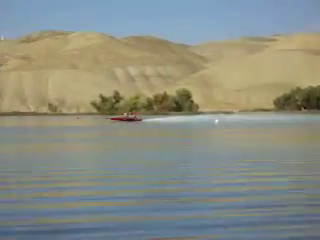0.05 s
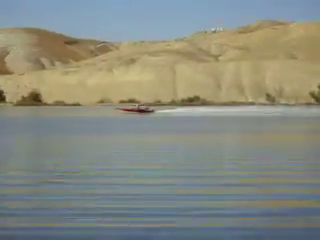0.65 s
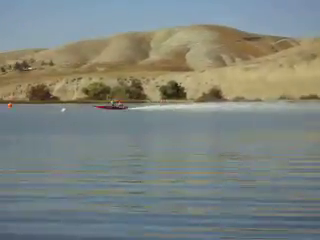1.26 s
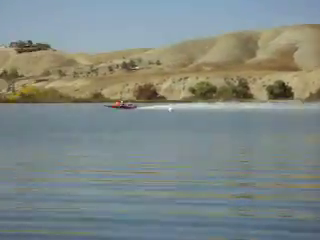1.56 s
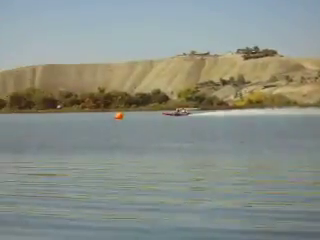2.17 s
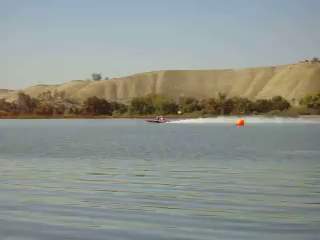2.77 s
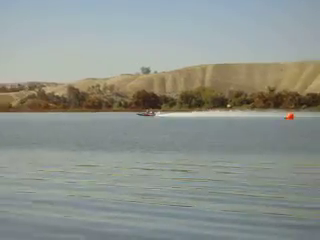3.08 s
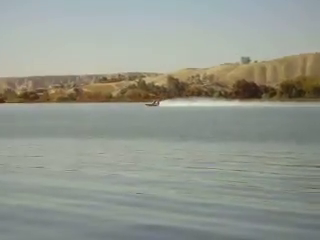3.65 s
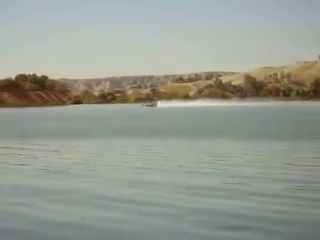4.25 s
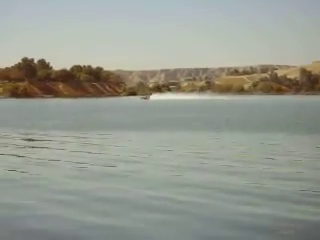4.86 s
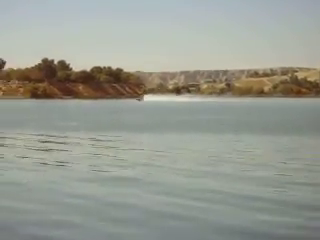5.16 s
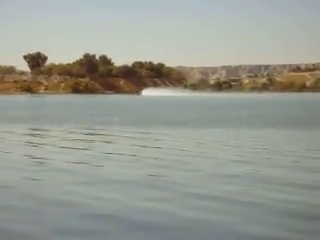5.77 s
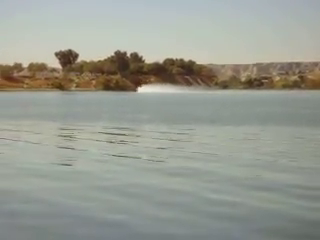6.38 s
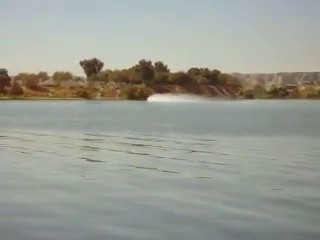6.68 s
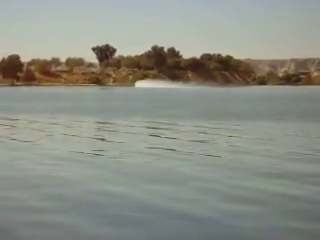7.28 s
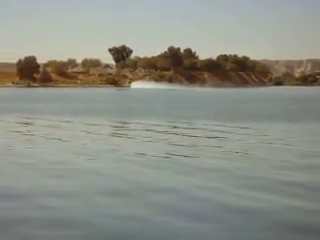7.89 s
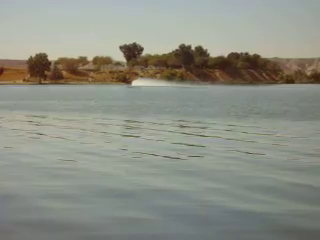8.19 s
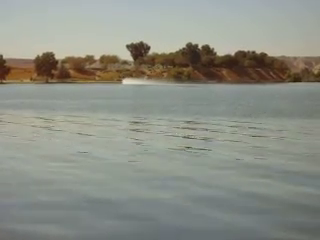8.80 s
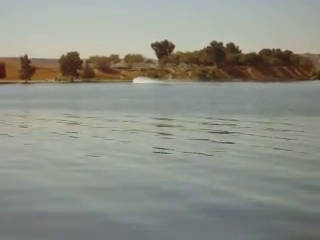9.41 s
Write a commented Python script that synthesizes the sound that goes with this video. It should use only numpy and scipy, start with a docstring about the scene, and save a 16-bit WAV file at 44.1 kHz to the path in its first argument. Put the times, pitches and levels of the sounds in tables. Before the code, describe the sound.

Heard from the shore through a small, slightly overloaded microphone, a speedboat tears by on a lake with a loud, rough engine drone and a faint high hiss. Its exhaust crackles at the nearest point, where there is a single click and a light swell of wind. The engine throbs, keeps dropping in pitch and ends in a lower, still strong burble, with a dull echo from the hills.

```python
"""A racing boat with an open-piped V8 comes by far out on a lake, its pitch sinking as it goes.
At first it is side-on: uneven firings make a stack of tones and a ragged roar, with a thin gear whine.
Near 2 s it is closest, each firing cracks, and the sound skips once with a click. A breeze swells.
The boat turns its stern to us and runs away; from about 6 s the throttle eases and the pipes burble.
All along, the hills echo it and a small microphone overloads on the peaks."""
import sys
import numpy as np
from scipy import signal
from scipy.fft import rfft, irfft
from scipy.io import wavfile
from scipy.ndimage import uniform_filter1d

SR = 44100
rng = np.random.default_rng(int(sys.argv[2]) if len(sys.argv) > 2 else 0)


def to_wav(sig):
    """Store sig (one row per channel, or 1-D mono) as 16-bit WAV at the path in sys.argv[1].

    Samples outside -1..1 are clipped; the rate is SR.
    """
    pcm = np.clip(np.atleast_2d(sig), -1, 1) * 32767
    pcm = np.round(pcm).astype(np.int16)
    wavfile.write(sys.argv[1], SR, pcm.T)  # frames by channels


N = 420713
TIME = np.arange(N) / SR

# breeze on the microphone: time_s, level_db
BREEZE_LEVEL = [(0, -55.5), (1.5, -42.5), (3, -38), (3.7, -62.5), (6, -60.5), (9.54, -59)]
# engine speed as heard (all eight cylinders fire once a cycle): time_s, cycle_hz
ENGINE_SPEED = [(0.0, 57.1), (0.29, 56.77), (1.03, 54.4), (1.51, 53.39), (1.75, 52.2), (1.91, 52.32),
                (2.15, 51.36), (2.55, 50.94), (2.82, 50), (2.97, 50.1), (3.67, 49.1), (4.04, 47.43),
                (4.7, 47.1), (5.0, 45.72), (5.63, 44.17), (5.95, 41.77), (6.3, 41.25), (6.8, 37.97),
                (7.15, 37.8), (7.41, 35.3), (8.07, 33.28), (8.34, 31.96), (8.53, 31.7), (8.82, 31.8),
                (8.98, 31.59), (9.54, 29.29)]
# the boat turns away (astern is 0 side-on, 1 from behind): time_s, astern, gain_db
BOAT_VIEW = [(0, 0.11, 0.53), (2, 0, 2.13), (3.5, 0.51, 0.5), (5, 0.77, 0.28), (6.5, 1, 1),
             (9.54, 0.94, 0.5)]
# strongest tones, at multiples of the cycle rate: harmonic, side_db, half_turned_db, behind_db
STRONG_TONES = [(8, -8, -19, -24), (11, -19.5, -19, -16), (16, -13.5, -16, -19.5), (19, -12.5, -24, -28),
                (21, -8.5, -21, -25.8)]
# how the pipes send out the other tones: harmonic, side_db, behind_db
OTHER_TONES = [(1.0, 1.7, -17), (2.0, -20, -12.5), (3.0, 14.5, -4.5), (4.0, -8, -6.5), (5.0, 19, 8),
               (6.0, -36, 3.5), (7.0, -1, 8), (9.0, 2, 10), (10.0, 5.5, 4), (12.0, 5, -6.5), (13.0, 2.7, 4),
               (14.0, 5, 1.5), (15.0, 0, 0.5), (17.0, 9, 1.9), (18.0, 3.2, -0.5), (20.0, 2.5, 1.3),
               (22.0, 4, 2), (23.0, -3.5, -2.5), (24.0, -3.5, 4.5), (25.0, -6, -8), (26.0, 10, -1),
               (27.0, -13.5, -12), (28.0, -8, 1), (29.0, -18.7, -5.6), (30.0, -4.5, -6.5)]
# where the pipes ring: pitch_hz, width_hz, level_db
PIPE_RESONANCES = [(245, 94, 3.5), (347.8, 8.3, -7), (397.4, 43.5, 1.75), (445.3, 58, -4.5), (581, 46, 3),
                   (631.3, 89, 3.5), (723.6, 94, 3), (954, 163, -3.5), (1070.6, 29, -9)]
# tone colour of the pipes and of each noise: pitch_hz, level_db
PIPE_COLOUR = [(50.0, -15), (100.0, 6), (160.0, -6), (300.0, -15.5), (420.0, -6.5), (520.0, -1),
               (620.0, -4.5), (740.0, 1), (880.0, -9), (1020.0, -4.5), (1200.0, -1.5), (1400.0, -24.5),
               (1800.0, -21)]
BREEZE_COLOUR = [(25, -13), (38, -4.5), (52, 7), (70, -9), (120, -23.5)]
SPRAY_COLOUR = [(3900, -20), (4400, 6), (5100, 4), (5500, -16)]
HISS_COLOUR = [(2000, -12), (2600, -4), (3100, 13), (3600, 4), (3950, -1), (4300, -19)]
RASP_COLOUR = [(1200, -27), (1450, 9), (1750, 7), (2050, -6), (2350, -9), (2900, -10)]
CRACK_COLOUR = [(1300, -23), (1700, -6), (1900, 7), (2200, -3), (2550, -9), (2900, -20)]
BARK_COLOUR = [(850, -22), (970, -5.5), (1080, 3), (1200, -1), (1320, -12), (1500, -17)]
BURBLE_COLOUR = [(30, -31.5), (50, -12.5), (80, -4), (130, 2), (220, 2.5), (300, 4), (420, -27)]
ROAR_COLOUR = [(280, -28.5), (350, -4.5), (420, -5.5), (520, -5), (650, 0), (780, -0.5), (900, -2.5),
               (1000, -10.5), (1100, -24.5)]
# loudness of the exhaust: time_s, tones_db, roar_db
EXHAUST_LEVEL = [(0, -28, -26), (1.4, -28, -23.5), (2.6, -26.5, -27), (3.4, -22.5, -26), (4.3, -24, -23),
                 (5.4, -27.5, -28), (6.5, -25.5, -25.5), (8.05, -28, -25.5), (8.3, -24.8, -22),
                 (9.0, -24.8, -21), (9.54, -28, -21.8)]
# what changes with the way the pipes face the shore: time_s, crack_db, throb (0 to 1), bark_db
PIPE_FACING = [(0, -19, 0, -28.5), (1.3, -12, 0.25, -25), (1.9, -10, .3, -26), (2.8, -5, 0.2, -23),
               (3.3, -18, 0.98, -21.5), (3.8, -26, 0.62, -24), (4.4, -30, 0.26, -24.5),
               (7.7, -31, 0.1, -29), (9.54, -31, 0.1, -29)]
# loudness shared by the rasp and the cracks: time_s, level_db
RASP_LEVEL = [(0.05, -26.5), (0.76, -33.5), (1.04, -29), (2.88, -29), (3.66, -32), (6.67, -40), (6.72, -36),
              (8.24, -33), (8.35, -27.5), (8.74, -34.5), (9.06, -33), (9.45, -44)]
# spells of gear whine: start_s, length_s, level_db
WHINES = [(0.0, 0.6, -30), (0.916, 0.52, -29)]
# sizzles of exhaust gas: start_s, length_s, pitch_hz, width_hz, level_db
SIZZLES = [(0.113, 0.27, 4500, 1400, -41.5), (0.848, 0.94, 3700, 1500, -40), (1.7, 1.55, 3800, 1300, -42),
           (3.22, 0.44, 3170, 450, -37), (4.05, 0.88, 3700, 600, -42.5), (5.497, 0.7, 3350, 1300, -41.5),
           (6.2, 0.6, 3300, 1350, -39.5), (8.25, 0.27, 2969, 700, -44.5)]

NEAR_BANK = (0, 1, 3, 6)  # of eight slots a cycle, those in which the near row of cylinders fires
NEAREST_S, NEAREST_M, BOAT_M_PER_S = 1.7, 110, 49  # the pass; distance dulls the hiss and spray


def undb(db):
    """Turn decibels into a gain."""
    return 10 ** (np.asarray(db) / 20)


def unit(x):
    """Scale a sound to an average (rms) level of 1."""
    return x / np.sqrt(np.mean(x ** 2))


def curves(table):
    """Turn each column after time_s into one value a sample."""
    time_s, *columns = np.transpose(table)
    return [np.interp(TIME, time_s, column) for column in columns]


def db_at(spectrum, hz):
    """Look up a tone colour's level at a pitch."""
    pitch_hz, db = np.transpose(spectrum)
    return np.interp(np.log(hz), np.log(pitch_hz), db)


def colour(x, spectrum, size=8192):
    """Filter a sound to a tone colour, cutting steeply outside it; the result has level 1."""
    hz = np.arange(size // 2 + 1) * SR / size + 1
    octaves_outside = np.abs(np.log2(hz / np.clip(hz, spectrum[0][0], spectrum[-1][0])))
    gain = undb(db_at(spectrum, hz) - np.minimum(24 * octaves_outside, 60))
    cepstrum = irfft(np.log(gain), size)
    cepstrum[size // 2:] = 0  # so the filter rings only after a sound, never before
    response = irfft(np.exp(2 * rfft(cepstrum)), size)
    return unit(signal.oaconvolve(x, response)[:N])


def wander(rate_hz, time=TIME):
    """A smooth random wobble, about 1 in size, with about rate_hz turns a second."""
    knots = rng.standard_normal(2048)
    smooth = signal.resample(knots, 8 * len(knots))
    return np.interp(time * rate_hz * 8, np.arange(len(smooth)), smooth)


def spell(start_s, length_s, fade_s=0.12):
    """Rise from 0 to 1, hold, and fall back."""
    return np.clip(np.minimum(TIME - start_s, start_s + length_s - TIME) / fade_s, 0, 1)


def firings(cycle, far_bank_db, scatter_db):
    """One pulse of uneven size for each firing; the far row of cylinders is weaker."""
    slots = np.arange(1, int(8 * cycle[-1]))
    position = np.interp(slots / 8, cycle, np.arange(N))
    bank_db = np.where(np.isin(slots % 8, NEAR_BANK), 0, far_bank_db)
    size = undb(bank_db + scatter_db * rng.standard_normal(len(slots)))
    i, part = position.astype(int), position % 1  # each pulse is shared by two samples
    return (np.bincount(i, size * (1 - part), N + 1) + np.bincount(i + 1, size * part, N + 1))[:N]


def puffs(pulses, decay_s, steady):
    """Gas noise that flares at each firing and dies back to a steady rush."""
    flare = signal.lfilter([1], [1, -np.exp(-1 / (SR * decay_s))], pulses)
    return (unit(flare) + steady) * rng.standard_normal(N)


def breeze():
    """Light wind rumbles on the microphone."""
    level_db, = curves(BREEZE_LEVEL)
    return colour(rng.standard_normal(N), BREEZE_COLOUR) * undb(level_db + 1.1 * wander(4.0))


def hill_echo(x, first_s, decay_s):
    """The slopes around the lake send back a late, dull, scattered echo."""
    t = np.arange(2 * SR) / SR
    response = rng.standard_normal(len(t)) * (t > first_s) * np.exp(-t / decay_s)
    echo = signal.fftconvolve(x, response / np.linalg.norm(response))[:N]
    return signal.sosfilt(signal.butter(2, [350, 1300], "band", fs=SR, output="sos"), echo)


def spray(farther_m, astern, loss_db_per_m=0.2):
    """Flying water makes a high rush that fades quickly with distance."""
    level_db = -43.8 - loss_db_per_m * farther_m - 9.3 * astern
    return colour(rng.standard_normal(N), SPRAY_COLOUR) * undb(level_db)


def hiss(cycle, farther_m, loss_db_per_m=0.016):
    """Each firing spits a short hiss that fades slowly with distance."""
    gas = puffs(firings(cycle, far_bank_db=-1.5, scatter_db=3.5), decay_s=0.001, steady=0.22)
    return colour(gas, HISS_COLOUR) * undb(-45.3 - loss_db_per_m * farther_m)


def sizzles(cycle):
    """Now and then the gas sizzles brightly, in time with the firings."""
    gas = puffs(firings(cycle, far_bank_db=-5.5, scatter_db=2.5), decay_s=0.0012, steady=0.34)
    out = np.zeros(N)
    for start_s, length_s, hz, width_hz, db in SIZZLES:
        band = signal.butter(2, [hz - width_hz / 2, hz + width_hz / 2], "band", fs=SR, output="sos")
        out += unit(signal.sosfilt(band, gas)) * undb(db) * spell(start_s, length_s)
    return out


def gear_whine(cycle, harmonic):
    """Gears add a thin, rough whine that follows the engine speed."""
    phase = 2 * np.pi * harmonic * cycle
    level = sum(undb(db) * spell(start_s, length_s) for start_s, length_s, db in WHINES)
    return level * ((1 + .6 * wander(110)) * np.cos(phase) + 0.45 * wander(110) * np.sin(phase))


def crack_and_rasp(cycle, pulses, astern):
    """Side-on, each firing cracks cleanly; as the boat leaves, the cracks blur into a rasp."""
    level_db, = curves(RASP_LEVEL)
    crack_db, _, _ = curves(PIPE_FACING)
    crack = colour(firings(cycle, far_bank_db=-8, scatter_db=1.5), CRACK_COLOUR)
    rasp = colour(puffs(pulses, decay_s=0.0021, steady=0.49), RASP_COLOUR)
    return (crack * undb(crack_db + 1.5) + rasp * undb(12.2 * astern - 10.5)) * undb(level_db)


def bark(cycle, cycle_hz, note_hz=1166):
    """The pipes bark once a cycle, part noise and part note."""
    _, throb, bark_db = curves(PIPE_FACING)
    swell = (1 + throb * np.cos(2 * np.pi * cycle)) ** 2
    swell /= np.sqrt(uniform_filter1d(swell ** 2, size=SR // 5))  # deeper throb, same loudness
    noise = colour(swell * rng.standard_normal(N), BARK_COLOUR) * undb(bark_db - 0.2)
    from_peak_s = ((cycle + .5) % 1 - .5) / cycle_hz
    note = unit(np.cos(np.pi * cycle) ** 6 * np.sin(2 * np.pi * note_hz * from_peak_s))
    return noise + note * throb * undb(-17)


def burble(pulses, cycle_hz, astern, ease_below_hz=42, ease_span_hz=4):
    """Low puffs of gas, which grow louder once the throttle is eased."""
    _, roar_db = curves(EXHAUST_LEVEL)
    eased = np.clip((ease_below_hz - cycle_hz) / ease_span_hz, 0, 1)
    level_db = roar_db - 11 + 8.8 * eased - 3.6 * astern
    return colour(puffs(pulses, decay_s=.003, steady=1.0), BURBLE_COLOUR) * undb(level_db)


def roar(pulses):
    """No two firings burn alike, so a ragged roar fills the gaps between the tones."""
    _, roar_db = curves(EXHAUST_LEVEL)
    return colour(puffs(pulses, decay_s=0.0019, steady=0.73), ROAR_COLOUR) * undb(roar_db - 1)


def pipe_ring_db(hz):
    """How strongly the pipes ring at this pitch."""
    gains = (undb(db) / (1 + (2 * (hz - pitch) / width) ** 2) for pitch, width, db in PIPE_RESONANCES)
    return 10 * np.log10(sum(gain ** 2 for gain in gains))


def exhaust_tones(cycle, cycle_hz, astern, half_turned=0.77):
    """The uneven firing pattern repeats, making a stack of tones; moving air makes each one flutter."""
    step = 6  # the tones are low, so every sixth sample is enough
    tones_db, _ = curves(EXHAUST_LEVEL)
    time, cycle, cycle_hz, astern, tones_db = (
        v[::step] for v in (TIME, cycle, cycle_hz, astern, tones_db))
    strong = {round(k): by_view for k, *by_view in STRONG_TONES}
    others = {round(k): by_view for k, *by_view in OTHER_TONES}
    out = 0
    for harmonic in range(1, 45):
        hz = harmonic * cycle_hz
        pattern = np.exp(-2j * np.pi * harmonic * np.array(NEAR_BANK) / 8).sum()
        shaken = np.sqrt(harmonic / 16)  # short waves feel the moving air more
        flutter = shaken * wander(8.0, time)
        if harmonic in strong:  # these swell as they slide through the pipe resonances
            view_db = np.interp(astern, [0, half_turned, 1], strong[harmonic])
            db = view_db + pipe_ring_db(hz) + 1.32 * flutter
        else:
            # high tones, beyond the table, follow the gaps between one row's firings
            pattern_db = 10 * np.log10(abs(pattern) ** 2 + .5)
            side_db, behind_db = others.get(harmonic, (pattern_db - 15.5, pattern_db - 10.5))
            view_db = side_db + astern * (behind_db - side_db)
            db = tones_db + view_db + db_at(PIPE_COLOUR, hz) + 1.87 * flutter
        smear = 0.04486 * harmonic ** 2  # the pipes hold the lows back: each firing is a falling chirp
        drift = shaken * 0.73 * wander(3.0, time)
        phase = 2 * np.pi * harmonic * cycle + np.angle(pattern) + smear + drift
        out += np.sqrt(2) * undb(db) * np.cos(phase)
    return signal.resample_poly(out, step, 1)[:N]


def scene():
    """A light breeze, the echo from the hills and the boat itself."""
    cycle_hz, = curves(ENGINE_SPEED)
    astern, gain_db = curves(BOAT_VIEW)
    farther_m = np.hypot(NEAREST_M, BOAT_M_PER_S * (TIME - NEAREST_S)) - NEAREST_M
    cycle = np.cumsum(cycle_hz * (1 + 0.000801 * wander(14))) / SR  # engine cycles so far
    boat = exhaust_tones(cycle, cycle_hz, astern)
    shimmer = undb(1.3 * wander(9.0))  # moving air makes the hiss and spray waver together
    pulses = firings(cycle, far_bank_db=-5.0, scatter_db=3.5)
    boat += burble(pulses, cycle_hz, astern) + roar(pulses)
    boat += bark(cycle, cycle_hz) + crack_and_rasp(cycle, pulses, astern)
    boat += shimmer * (hiss(cycle, farther_m) + spray(farther_m, astern))
    boat += sizzles(cycle) + gear_whine(cycle, harmonic=34)
    boat *= undb(gain_db)
    return (breeze() + undb(-16.5) * hill_echo(boat, first_s=0.23, decay_s=0.43) + boat)[None]


def skip(x, at_s, gap_s, thump_s):
    """The sound breaks off for an instant and snaps back with a click and a small thump."""
    since_s = TIME - at_s
    gap = np.exp(-(since_s / gap_s) ** 2)
    click = undb(-3.5) * (since_s >= 0) * np.exp(-np.abs(since_s) / thump_s)
    return x * (1 - gap) + click


def record(dry):
    """A small microphone flattens the peaks and loses the high treble; the sound skips once."""
    ceiling, hardness = .71, 7.5
    rounded = dry / (1 + np.abs(dry / ceiling) ** hardness) ** (1 / hardness)
    dulled = signal.sosfilt(signal.ellip(7, .2, 70, 5600, fs=SR, output="sos"), rounded)
    flattened = np.clip(dulled, -1.01 * ceiling, 1.01 * ceiling)
    out = skip(flattened, at_s=2.021, gap_s=.002, thump_s=.0008)
    out = signal.sosfilt(signal.butter(1, 12, "high", fs=SR, output="sos"), out)
    return signal.sosfilt(signal.ellip(8, .2, 70, 15800, fs=SR, output="sos"), out)


dry = scene()
out = record(dry)
to_wav(out)
```